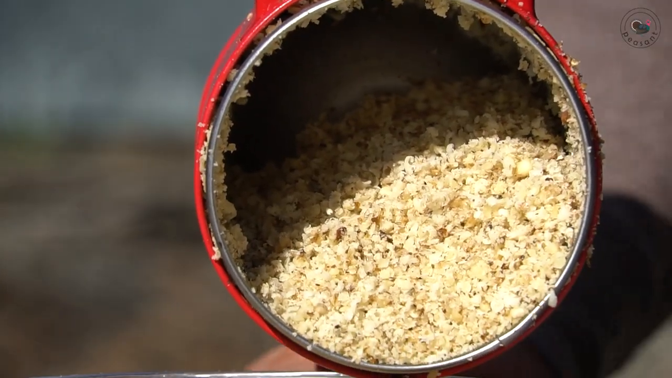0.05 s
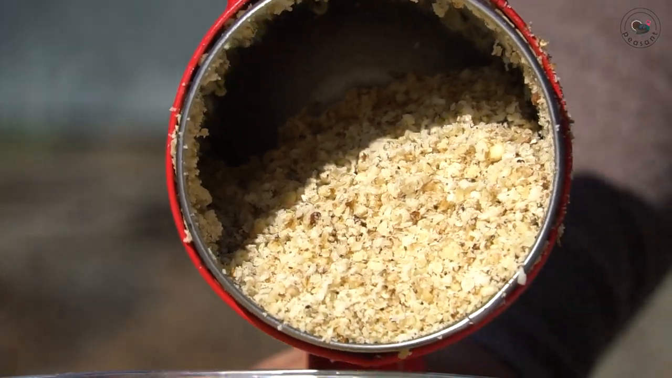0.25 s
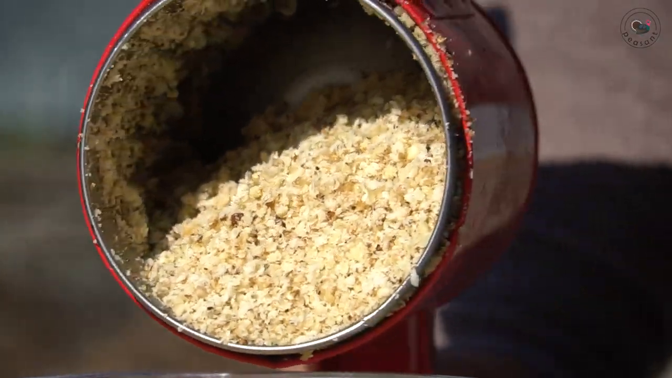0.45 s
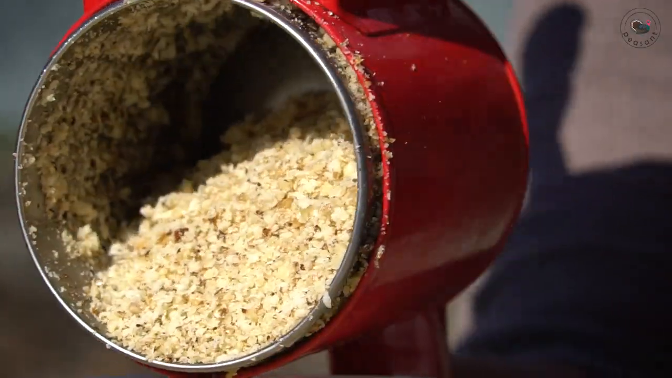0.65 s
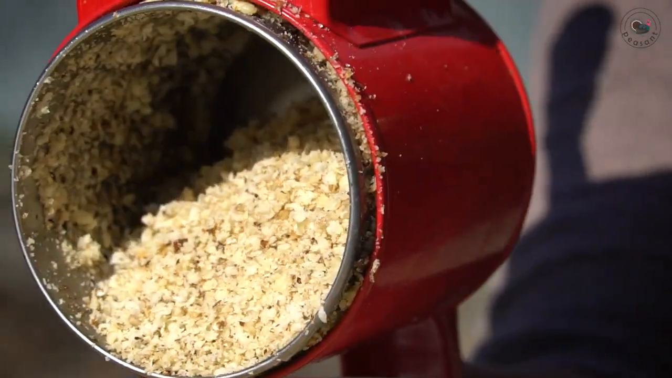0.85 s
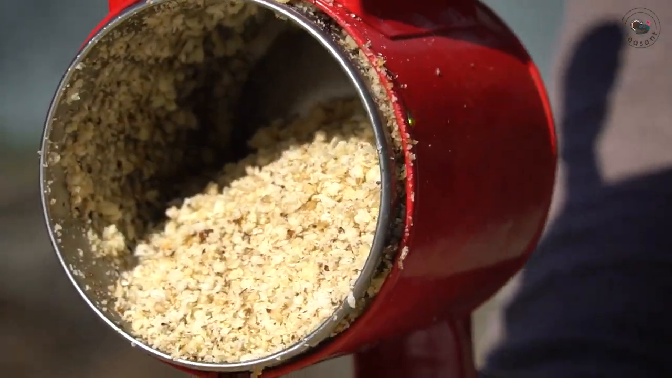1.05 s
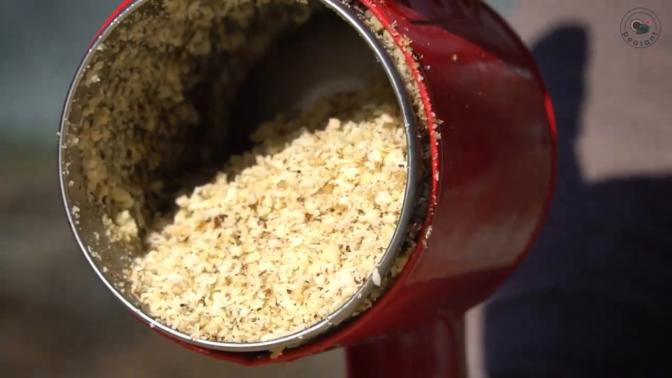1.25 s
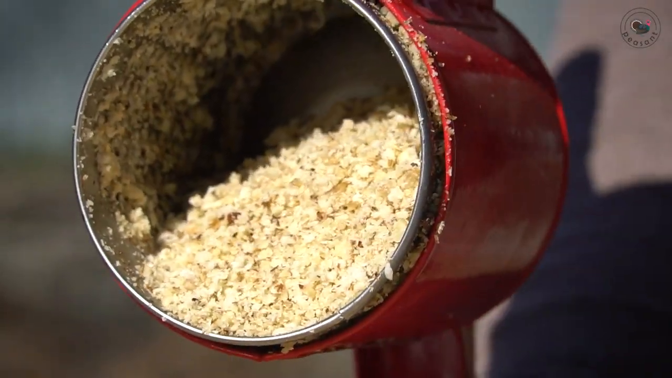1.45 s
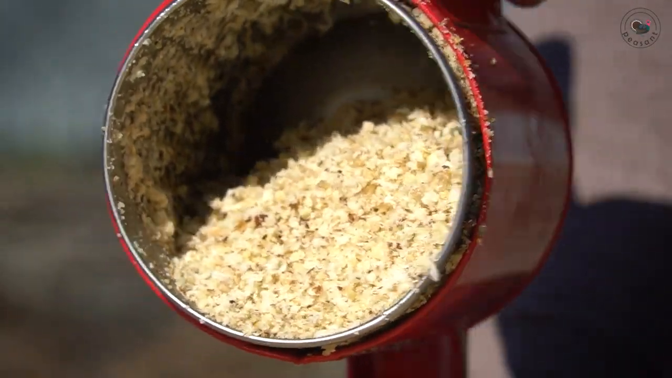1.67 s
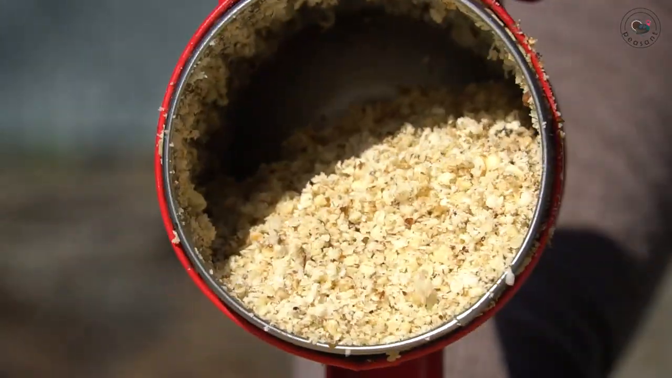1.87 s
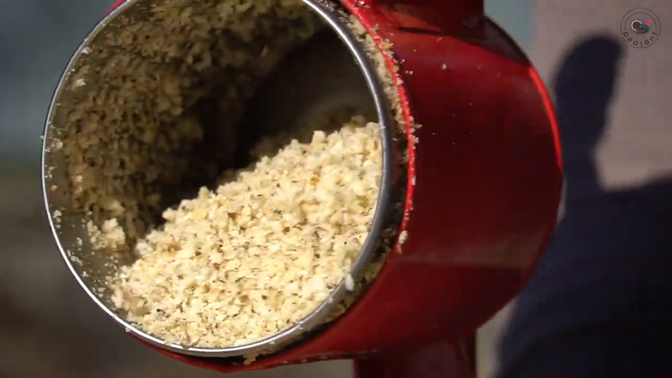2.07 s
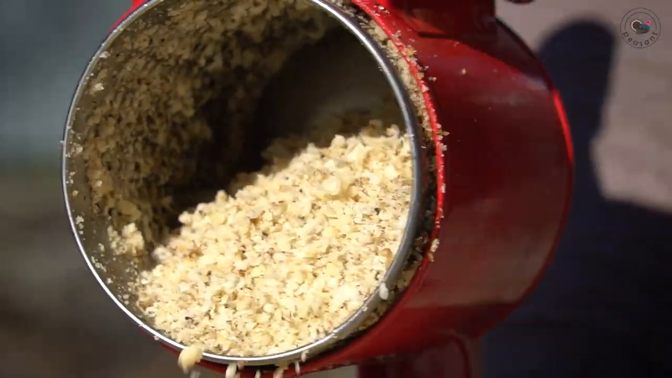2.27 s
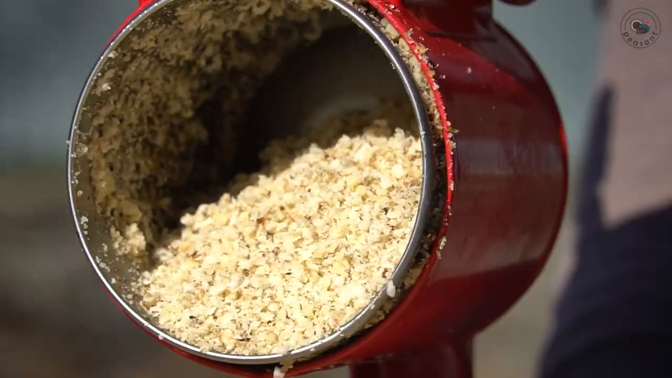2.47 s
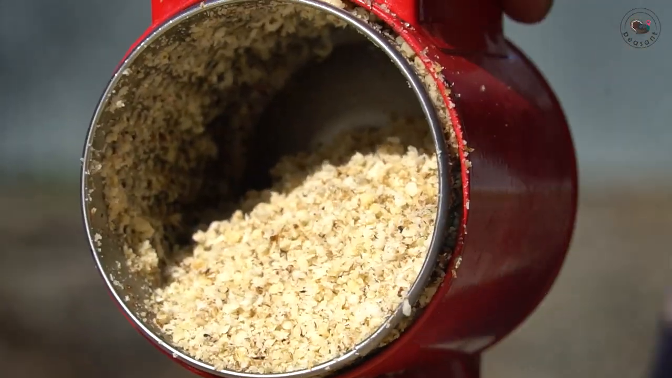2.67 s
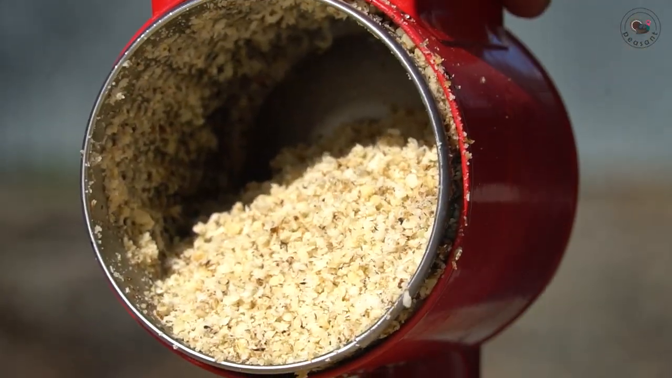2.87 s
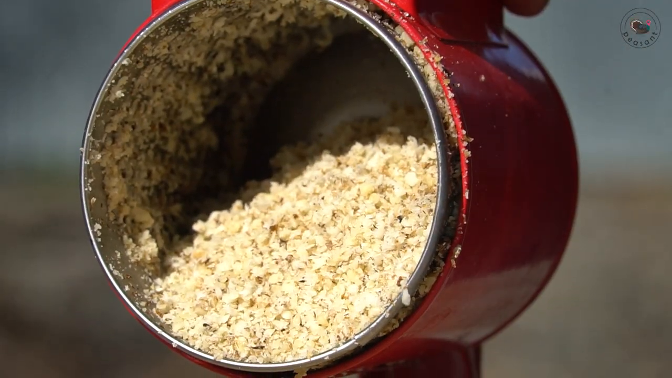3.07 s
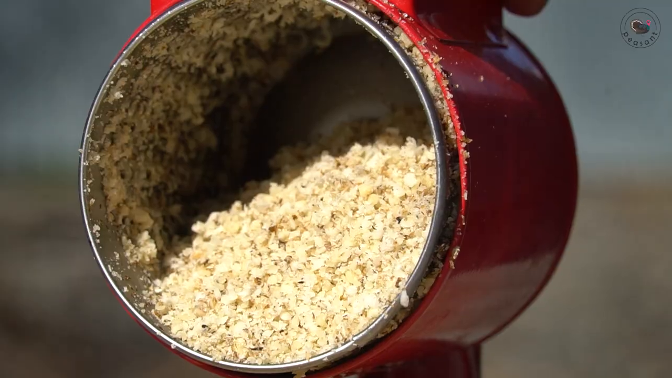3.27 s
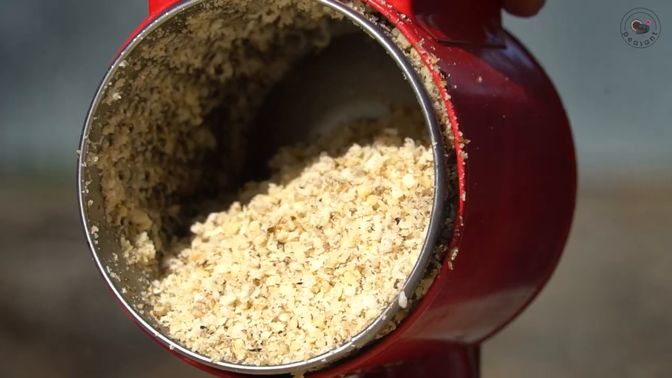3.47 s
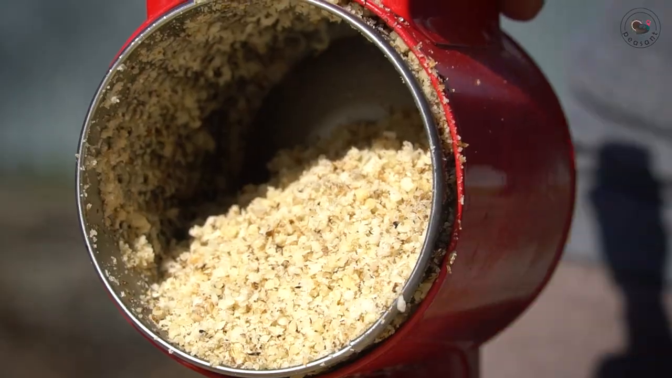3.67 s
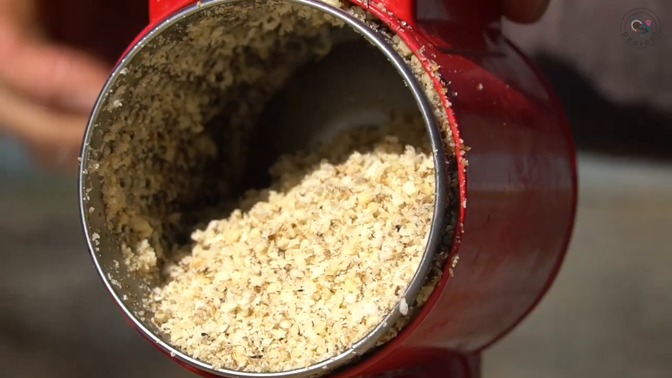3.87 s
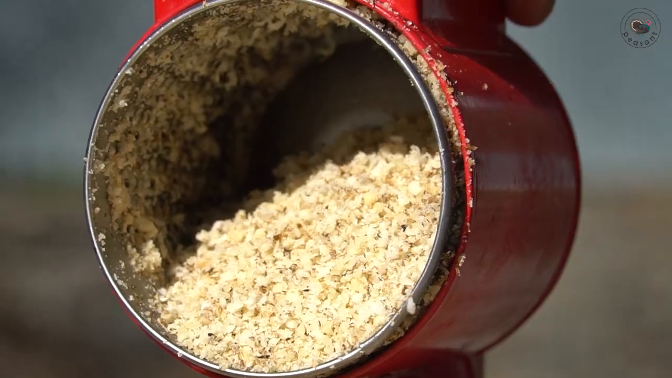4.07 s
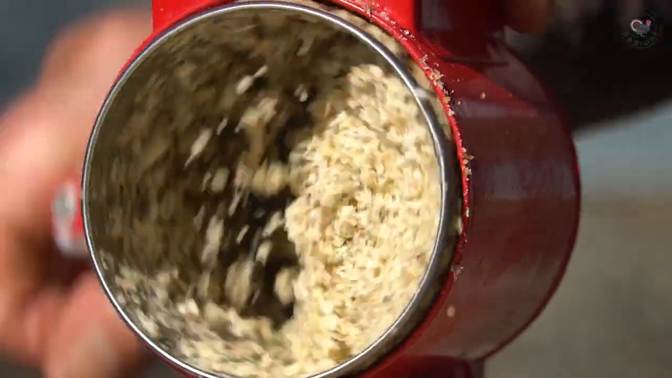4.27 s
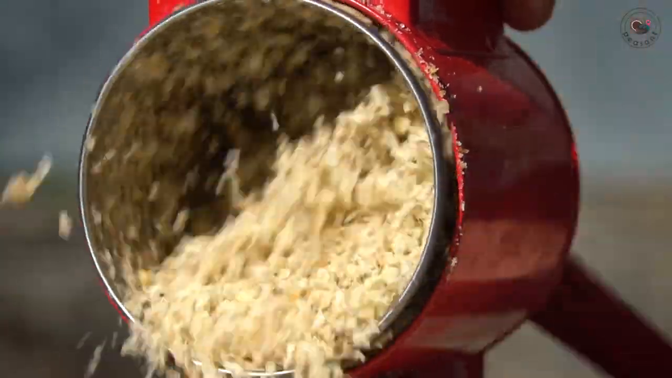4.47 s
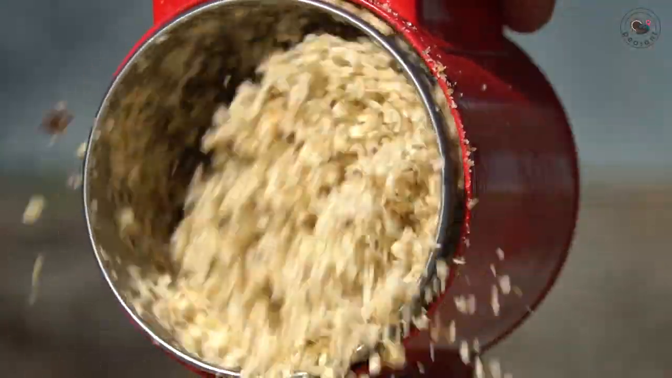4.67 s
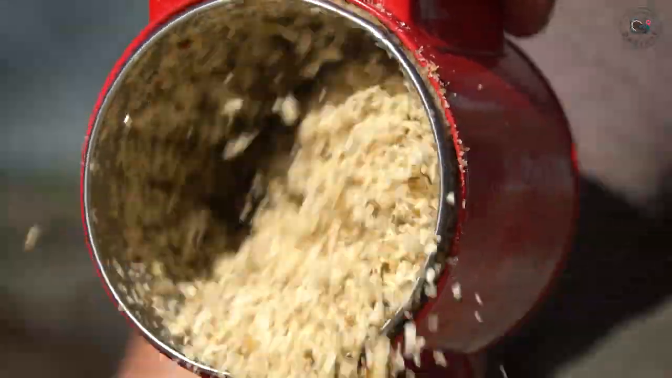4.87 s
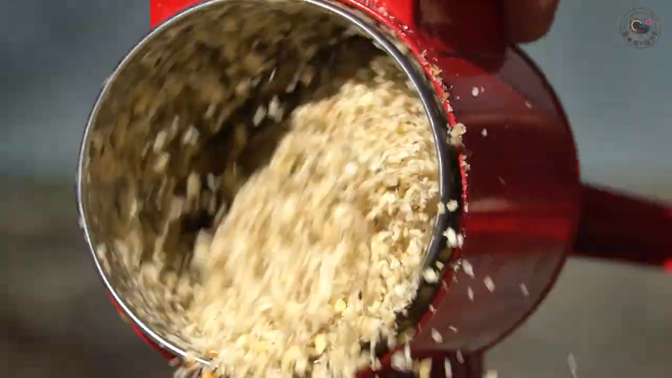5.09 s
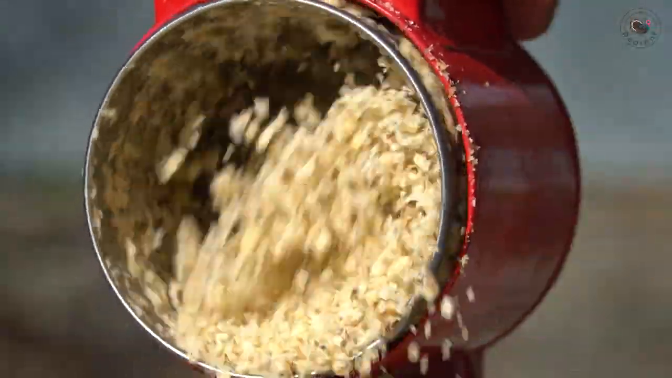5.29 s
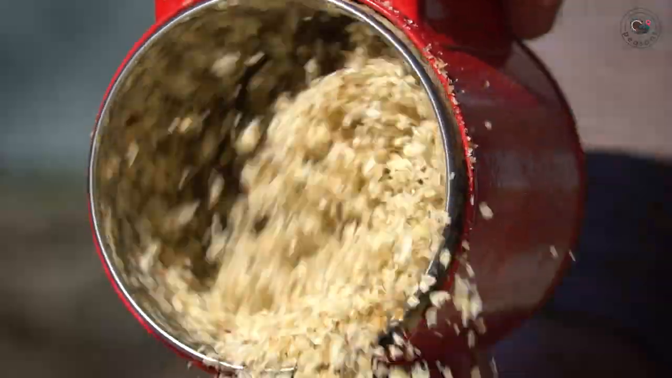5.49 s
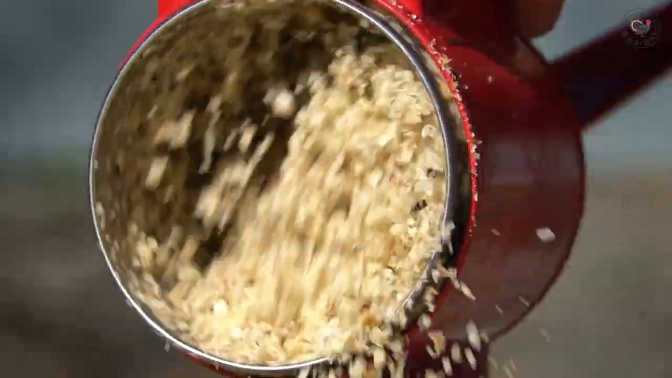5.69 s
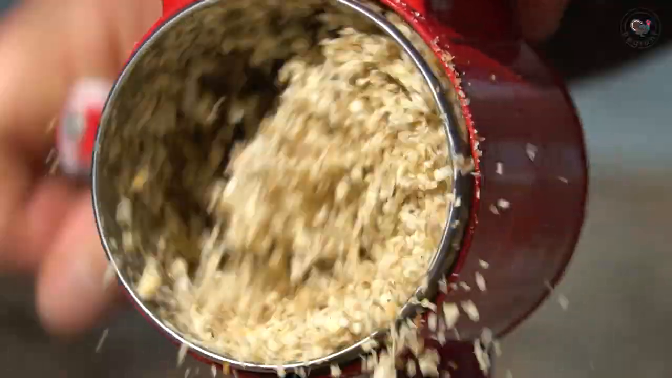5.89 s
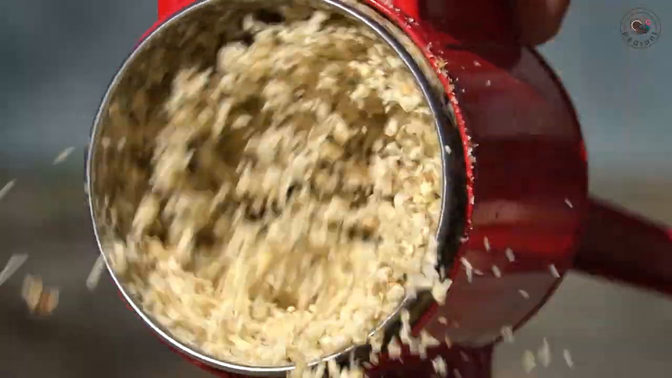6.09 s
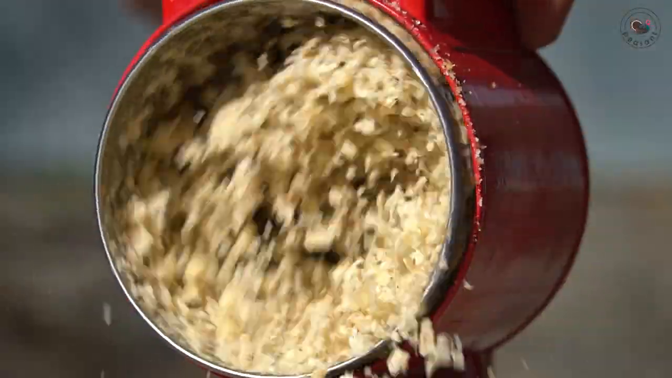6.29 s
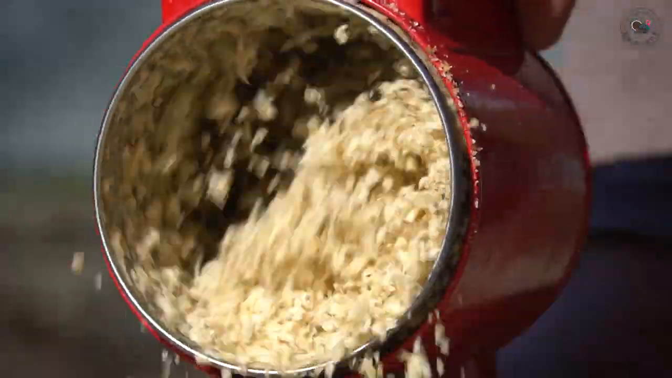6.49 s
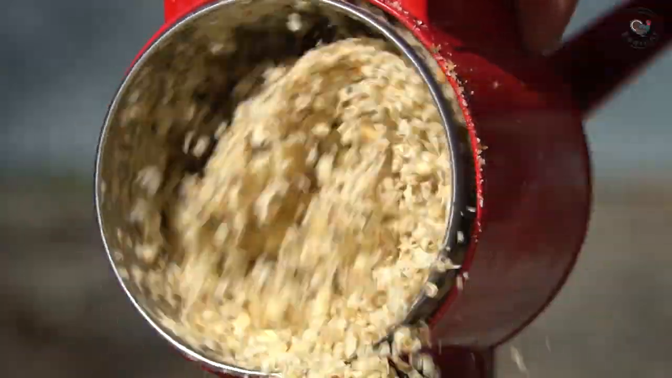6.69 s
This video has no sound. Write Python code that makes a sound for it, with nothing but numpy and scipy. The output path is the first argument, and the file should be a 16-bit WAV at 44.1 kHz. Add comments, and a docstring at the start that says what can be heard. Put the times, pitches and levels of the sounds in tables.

```python
"""An outdoor table in quiet air, the stereo microphone very close to a drum grater full of nuts.
While it is handled, a sleeve rustles, a palm slides over the enamel, the loose crank clacks and
the drum bumps in its housing. Then the crank is turned by hand: the cutters bite through the nuts
and shake housing and table, the steel drum rasps, nuts crack and gratings patter inside."""
import sys
import numpy as np
from scipy import signal
from scipy.fft import rfft, irfft
from scipy.io import wavfile
from scipy.ndimage import uniform_filter1d

SR = 44100
rng = np.random.default_rng(int(sys.argv[2]) if len(sys.argv) > 2 else 0)


def to_wav(s):
    """Save 16-bit WAV."""
    ch = np.atleast_2d(s).T  # columns
    pcm = np.round(np.clip(ch, -1, 1) * 32767)  # PCM
    wavfile.write(sys.argv[1], SR, pcm.astype(np.int16))


N = 297234
TIME = np.arange(N) / SR
HIT_TIME = TIME[:SR // 4]  # seconds within one knock

# Spectra at the microphone. Each row: frequency in Hz, relative level in dB.
AIR_SPECTRUM = [(15, -48), (25, -6.5), (82, -5), (217, -7.5), (309, -5.5), (503, -12.5), (796, -14.5),
                (2280, -22.5), (6920, -30.5), (14400, -32.5), (16000, -35)]
AIR_SIDE_SPECTRUM = [(80, -14), (200, -10.5), (700, -3.5), (2400, -1)]  # side against middle
SLEEVE_SPECTRUM = [(500, -12), (1500, -0.5), (2600, -3.5), (3300, 7), (4300, 3.5), (5200, -3), (7000, -10),
                   (16000, -17.5)]
SKIN_SPECTRUM = [(1500, -14), (4000, 0), (8000, -1), (13000, 0.5), (16000, -2)]  # skin on enamel
TICK_SPECTRUM = [(1200, 3), (1900, -3.5), (2400, -7.5), (3400, 4), (4300, -2.5), (5500, -12), (8000, -20),
                 (16000, -38)]  # hard parts meeting
SNAP_SPECTRUM = [(1000, -21), (3000, 3), (6000, 3.5), (9000, 2), (12000, -2), (16000, 0.5)]
CRACK_SPECTRUM = [(600, -16), (1400, 3.5), (2000, -7), (2450, -6), (3300, -7), (5000, -17.5), (16000, -48)]
STEEL_SPECTRUM = [(600, -34.5), (1100, -0.5), (1400, -8), (1750, -2.5), (2050, -0.5), (2450, -11),
                  (2950, -1), (3250, -5.5), (3600, -4.5), (4200, -10.5), (5100, -13.5), (5700, -10),
                  (6500, -17.5), (16000, -26)]  # the rasping drum
GRATINGS_SPECTRUM = [(1500, -41), (4000, 0), (7000, 4), (9000, 8), (10500, -3), (11800, 6), (13000, 1.5),
                     (14700, 9.5), (16000, -6)]

# Modes of struck parts. Each row: frequency in Hz, relative level in dB, seconds to fall 60 dB.
CRANK_MODES = [(122, -29, .12), (308, -4, 0.17), (495, -8, 0.14), (560, -5.5, 0.12), (659, -6, 0.056),
               (770, -3.5, 0.092), (957, -6, 0.089), (1225, 4.5, 0.024), (1433, 1, 0.037),
               (1657, -3, 0.025)]
SEAT_MODES = [(128, -24, 0.071), (205, -9.5, 0.17), (251, -2.5, 0.087), (306, 6, 0.078), (401, 7, 0.042)]  # the drum seated in its housing
SHELL_MODES = [(631, 3, 0.026), (808, -6, 0.056), (999, 0, 0.039), (1172, -7.5, 0.047), (1500, -0.5, 0.029),
               (1790, -30, 0.02)]  # the housing shell
WALL_MODES = [(1770, -5.5, 0.037), (1912, -8.5, 0.055), (2036, -1, 0.018), (2520, -7.5, 0.025),
              (3200, -4, 0.011), (3540, -19, 0.0083)]  # the steel drum wall, damped by the nuts inside
# Resonances of shaken parts. Each row: frequency in Hz, bandwidth in Hz, relative level in dB.
TABLE_RESONANCES = [(61.4, 12, -3.5), (106.6, 17, -9), (132, 7.5, -1.5)]
HOUSING_RESONANCES = [(239.6, 70, -5.5), (308.4, 25, 3.5), (386.4, 57, -0.5), (443.5, 75.6, 4),
                      (500, 102, 2), (620, 96, -1.5), (734, 98, 1.5), (837, 91, 1.5), (915.6, 76, -1.5)]

# Strokes of sleeve and palm. Each row: middle in seconds, length in seconds, relative level in dB.
SLEEVE_BRUSHES = [(0.034, 0.042, -48.5), (0.16, 0.17, -49), (0.406, .1, -46.5), (0.557, 0.1, -56.5),
                  (0.741, 0.02, -49.5), (1.0, 1, -64.5)]
PALM_SLIDES = [(0.12, 0.031, -54), (0.412, 0.15, -57), (1.475, 0.11, -59), (3.142, .1, -53)]
# Fingers shift on the housing. Each row: middle and length in seconds, relative rub and rumble in dB.
FINGER_RUBS = [(0.01, 0.093, -52, -50), (0.61, 0.1, -72, -55), (1.184, 0.062, -54, -52),
               (2.48, 0.21, -63, -58), (2.884, 0.066, -54.5, -60), (3.138, 0.16, -56, -62),
               (3.44, 0.14, -61, -52), (3.624, .16, -53, -51), (4.18, 0.08, -54, -55)]
# The crank drops through its play. Each row: start in seconds, relative level in dB, tick offset in dB.
CRANK_CLACKS = [(0.4, -17, -6), (0.5185, -19, -8.5), (1.2405, -15, -6.5), (1.8771, -15.5, -7),
                (2.0268, -18, -13), (3.9237, -17.5, -7.5)]
# The drum bumps in the housing. Each row: start in seconds, relative level in dB,
# shell offset in dB, wall and tick offset in dB, relative table level in dB.
DRUM_BUMPS = [(0.245, -28, -16, -22, -40.5), (0.894, -38.5, -13, -15, -46.5), (0.971, -36.5, -15, -29, -49),
              (1.008, -34, -13, -19, -55), (1.054, -33.5, -18, -14.5, -46),
              (1.322, -23, -10.5, -18.5, -44.5), (1.338, -27, -33, -23, -49), (1.669, -32.5, -29, -40, -51),
              (1.742, -14, -6.5, -27.5, -51), (1.793, -27, -24, -13.5, -43.5),
              (1.984, -33.5, -20, -28, -50), (2.1, -24, -12, -8.5, -45), (2.367, -29, -21, -14, -58),
              (2.443, -43.5, -4, -14, -60), (2.514, -37, -17, -24, -66), (2.631, -43, -9, -28, -56),
              (2.867, -39.5, -10, -4, -64), (2.953, -31.5, -17, -23, -55), (3.567, -41, -6, -8, -60),
              (3.787, -29.5, -15, -25, -58), (3.862, -15, -7, -12.5, -55), (4.069, -23, -27, -14, -50),
              (4.129, -20.5, -15.5, -9.5, -53), (4.74, -16.5, -8.5, -24, -50),
              (6.278, -12.5, -19.5, -23, -42)]
# Brittle bits snap and whole nuts crack. Each row: start in seconds, relative level in dB.
BIT_SNAPS = [(0.106, -39), (0.624, -38), (1.3966, -39), (4.1654, -40.5), (4.4766, -17), (4.6815, -17),
             (4.6897, -14), (4.898, -23), (5.035, -22.5), (5.104, -16.5), (5.5156, -20.5), (5.7547, -19),
             (6.4295, -22), (6.502, -23)]
NUT_CRACKS = [(4.232, -35), (4.3293, -20), (4.6604, -20.5), (4.731, -28), (5.0452, -27), (5.083, -25),
              (5.363, -20), (5.441, -23), (5.633, -27), (6.385, -29), (6.6164, -31)]
# The crank catches between pushes. Each row: time in seconds, depth in dB, recovery in seconds.
CRANK_CATCHES = [(5.11, -14.5, 0.077), (6.285, -8, 0.1)]
# Load on the cutters as nuts are pressed in and used up.
# Each row: time in seconds, relative housing level in dB, relative rasp level in dB.
CUTTER_LOAD = [(4.3, -27.5, -37.5), (4.47, -25.5, -34.5), (4.56, -28.5, -37.5), (4.66, -25.5, -35.0),
               (4.79, -29.5, -43.5), (4.87, -23.0, -34), (4.97, -28.5, -42.5), (5.09, -29.0, -36.5),
               (5.19, -28.5, -38), (5.23, -27.5, -38), (5.29, -33, -40.5), (5.45, -26, -35.5),
               (5.62, -26.5, -36.0), (5.87, -30.5, -36), (6.02, -24.5, -31.0), (6.14, -27, -33),
               (6.26, -24, -37), (6.37, -29.5, -39), (6.46, -24, -36.5), (6.54, -29.5, -38.5),
               (6.62, -24.5, -35.5), (6.74, -28.0, -35)]


def undb(db):
    """Decibels to gain."""
    return 10 ** (np.asarray(db) / 20)


def unit(x):
    """Scale to rms 1."""
    return x / np.sqrt(np.mean(x ** 2))


def crest(x):
    """Scale to peak 1."""
    return x / np.abs(x).max()


def walk(rate):
    """Glide to a new random value rate times a second, at rms 1."""
    hold = int(SR / rate)
    steps = np.repeat(rng.standard_normal(N // hold + 1), hold)
    return unit(uniform_filter1d(steps, hold)[:N])


def colour(x, spectrum, size=4096):
    """Minimum-phase filter with the given spectrum."""
    hz, db = np.transpose(spectrum)
    bin_hz = np.arange(size // 2 + 1) * SR / size
    log_gain = np.log(undb(np.interp(np.log(bin_hz + 1), np.log(hz), db)))
    cepstrum = irfft(log_gain)[:size // 2] * np.r_[1, np.full(size // 2 - 1, 2)]
    response = irfft(np.exp(rfft(cepstrum, size)))
    return signal.fftconvolve(x, response[None], axes=-1)[:, :x.shape[-1]]


def resonate(x, resonances):
    """Sum of resonances of alternating polarity."""
    return sum((-1) ** k * undb(db) * signal.lfilter(*signal.iirpeak(hz, hz / width, SR), x)
               for k, (hz, width, db) in enumerate(resonances))


def stereo(pair, side_db, pan_db=0):
    """Two signals as middle and side, leaning left by pan_db."""
    side = undb(side_db) * pair[1]
    return np.array([(pair[0] + side) * undb(pan_db / 2), (pair[0] - side) * undb(-pan_db / 2)])


def grains(rate, spread_db):
    """Two streams of tiny random impulses of uneven size, about rate a second."""
    impulses = (rng.random((2, N)) < rate / SR) * rng.choice([-1, 1], (2, N))
    return impulses * undb(spread_db * np.minimum(rng.standard_normal((2, N)), 2.5))


def burst(spectrum, t60):
    """A short crack of noise, at peak 1."""
    noise = rng.standard_normal((2, len(HIT_TIME)))
    return crest(colour(noise * undb(-60 * HIT_TIME / t60), spectrum))


def ring(modes, lag_s, detune):
    """Struck modes build over half a cycle; bending waves bring the low ones later (lag_s at 1 kHz)."""
    out = 0
    for k, (hz, db, t60) in enumerate(modes):
        age = np.maximum(HIT_TIME - lag_s * np.sqrt(1000 / hz), 0)
        envelope = np.minimum(2 * hz * age, 1) * undb(db - 60 * age / t60)
        detuned_hz = hz * (1 + detune * rng.standard_normal())
        out = out + (-1) ** k * envelope * np.sin(2 * np.pi * detuned_hz * age)
    return out


def add(out, start, sound):
    """Mix in one knock, start seconds into the scene."""
    i = int(start * SR)
    out[:, i:i + len(HIT_TIME)] += sound[..., :N - i]


def strokes(rows):
    """Gain of smooth strokes, each above half strength for its length."""
    return sum(undb(db) * 0.5 ** ((2 * (TIME - middle) / length) ** 2) for middle, length, db in rows)


def open_air(level_db=-54):
    """Steady, quiet air all round the microphone, narrow in the bass."""
    air = undb(level_db) * unit(colour(rng.standard_normal((2, N)), AIR_SPECTRUM))
    return stereo([air[0], colour(air[1:], AIR_SIDE_SPECTRUM)[0]], side_db=0)


def sleeve(gain_db=-1):
    """A sleeve brushes past, its fibres crackling finely."""
    fibres = grains(rate=1500, spread_db=6) * undb(2.9 * walk(100.5))
    cloth = stereo(unit(colour(fibres, SLEEVE_SPECTRUM)), side_db=-0.5, pan_db=-1)
    return undb(gain_db) * strokes(SLEEVE_BRUSHES) * cloth


def palm(crumb_db=-7):
    """Skin slides over enamel with a soft, bright swish, rolling a few crumbs."""
    skin = unit(grains(rate=14000, spread_db=8))
    crumbs = undb(crumb_db) * unit(grains(rate=120, spread_db=5))
    return strokes(PALM_SLIDES) * stereo(unit(colour(skin + crumbs, SKIN_SPECTRUM)), side_db=-2)


def rocking(rise_s=0.02, fall_s=0.084, clack_db=-46):
    """Gain of the grater rocking on the table: it swells into each knock and dies away after it."""
    knocks = [(at, db) for at, *_, db in DRUM_BUMPS] + [(at, clack_db) for at, *_ in CRANK_CLACKS]
    swells = (undb(db) * np.exp(-np.maximum((at - TIME) / rise_s, (TIME - at) / fall_s))
              for at, db in knocks)
    return np.sqrt(sum(swell ** 2 for swell in swells))


def grip(gain_db=-1, slip_db=-8):
    """Fingers rub the housing and the table rumbles, as the hand shifts or a knock rocks the grater."""
    rock = rocking()
    rub_gain = undb(slip_db) * rock + strokes((at, length, db) for at, length, db, _ in FINGER_RUBS)
    rumble_gain = rock + strokes((at, length, db) for at, length, _, db in FINGER_RUBS)
    friction = grains(rate=1600, spread_db=5.5) * undb(2 * walk(40))
    rub = resonate(friction, HOUSING_RESONANCES) + undb(-10.5) * colour(friction, CRACK_SPECTRUM)
    housing = stereo(unit(rub), side_db=-8.5, pan_db=-1)
    # a resting hand damps the table, so its boom is broad
    damped_spectrum = [(30, -15), (55, -5), (72, 3), (95, -5.5), (125, -7), (170, -8.5), (400, -46)]
    rumble = colour(grains(rate=2000, spread_db=4.5), damped_spectrum)
    table = stereo(unit(rumble), side_db=-33, pan_db=1.5)
    return undb(gain_db) * (rub_gain * housing + rumble_gain * table)


def crank_clacks(ring_db=-1, tick_db=4, rebound_s=0.00456, rebound_db=-7):
    """The crank hits its stop with a hard tick and rebounds once, softer and duller."""
    out = np.zeros((2, N))
    # the same stop is struck each time, so the clacks ring alike
    rings = np.array([ring(CRANK_MODES, lag_s=0.00096, detune=0.013) for _ in range(2)])
    body = stereo(crest(rings), side_db=-12.5, pan_db=-0.5)
    rebound = undb(rebound_db) * signal.lfilter(*signal.butter(2, 1100, fs=SR), body)
    for start, db, bright_db in CRANK_CLACKS:
        tick = stereo(burst(TICK_SPECTRUM, t60=0.018), side_db=1, pan_db=-5)
        add(out, start, undb(db + ring_db) * body)
        add(out, start + rebound_s, undb(db + ring_db) * rebound)
        add(out, start, undb(db + bright_db + tick_db) * tick)
    return out


def rattle(blow, db, t60, rate=500):
    """A blow followed by a fading scatter of loose contacts."""
    n = len(HIT_TIME)
    contacts = (rng.random(n) < rate / SR) * rng.standard_normal(n)
    fade = undb(db - 60 * HIT_TIME / t60) * (HIT_TIME > 0.006)
    return blow + signal.fftconvolve(blow, contacts * fade)[:n]


def drum_bumps(thud_db=-4, shell_db=6, wall_db=4, tick_db=6, thump_db=9, thump_hz=105, thump_t60=0.13):
    """The drum thuds in its seat, rattles and thumps the table; hard contacts ring its wall and tick."""
    out = np.zeros((2, N))
    for start, db, mid_db, bright_db, table_db in DRUM_BUMPS:
        thud = undb(thud_db) * crest(ring(SEAT_MODES, lag_s=0.0009, detune=0.039))
        shell = undb(mid_db + shell_db) * crest(ring(SHELL_MODES, lag_s=0.00132, detune=0.049))
        body = rattle(thud + shell, db=-22, t60=0.25)
        wall = undb(bright_db + wall_db) * crest(ring(WALL_MODES, lag_s=0.00078, detune=0.033))
        thump = ring([(thump_hz, table_db - db + thump_db, thump_t60)], lag_s=0.001, detune=0.15)
        tick = undb(bright_db + tick_db) * burst(TICK_SPECTRUM, t60=0.022)
        middle = body + wall + thump + tick[0]
        add(out, start, undb(db) * stereo([middle, tick[1]], side_db=-4, pan_db=2.5))
    return out


def nut_fractures(snap_db=2.5, crack_db=3):
    """Small bits snap bright and dry; whole nuts crack against the drum, lower and longer."""
    out = np.zeros((2, N))
    for start, db in BIT_SNAPS:
        snap = stereo(burst(SNAP_SPECTRUM, t60=0.014), side_db=-6)
        add(out, start, undb(db + snap_db) * snap)
    for start, db in NUT_CRACKS:
        crack = stereo(burst(CRACK_SPECTRUM, t60=0.035), side_db=-3.5, pan_db=-2)
        add(out, start, undb(db + crack_db) * crack)
    return out


def table_boom(cuts):
    """Shaken by the cutting, the table top booms in its lowest modes."""
    push = signal.lfilter(*signal.butter(3, [58, 160], "band", fs=SR), cuts)
    return stereo(unit(resonate(push, TABLE_RESONANCES)), side_db=-27.5, pan_db=1.5)


def falling_gratings(chip_db=-6):
    """Gratings ride up the wall and pour back on to the steel, a few hard chips among soft flakes."""
    flakes = unit(grains(rate=9900, spread_db=5.5) * undb(1.6 * walk(90)))
    chips = undb(chip_db) * unit(grains(rate=38, spread_db=2.5))
    return unit(stereo(colour(flakes + chips, GRATINGS_SPECTRUM), side_db=-5.5, pan_db=-0.5))


def cranking(start_s=4.215, spin_up_s=0.093, catch_s=0.012, pour_db=-42, boom_db=-39):
    """Gains of housing, rasp, pour and boom: the crank spins up, catches twice and meets the load."""
    speed = np.clip((TIME - start_s) / spin_up_s, 0, 1)
    for at, depth_db, recovery_s in CRANK_CATCHES:
        seize = np.clip((TIME - at) / catch_s + 1, 0, 1)
        release = np.clip(1 - (TIME - at) / recovery_s, 0, 1)
        speed *= undb(depth_db * seize * release)
    times, housing_db, rasp_db = np.transpose(CUTTER_LOAD)
    housing = np.interp(TIME, times, housing_db)
    rasp = np.interp(TIME, times, rasp_db)
    # pour and boom follow about a third of the load's swing in dB; the boom also wavers
    pour = pour_db + 0.33 * (rasp - rasp_db.mean())
    boom = boom_db + 0.28 * (housing - housing_db.mean()) + 2 * walk(14)
    return speed * undb([housing, rasp, pour, boom])


def grating(bite_hz=68, jitter=0.35, fade_cycles=0.85, bite_spread_db=1.2, housing_db=0.5, rasp_db=1.5):
    """Cutters bite in uneven succession; each bite is a run of fractures shaking housing and drum."""
    housing_gain, rasp_gain, pour_gain, boom_gain = cranking()
    cycles = np.cumsum(bite_hz * np.exp(jitter * walk(60))) / SR
    strength = undb(bite_spread_db * rng.standard_normal(N))[cycles.astype(int)]
    bite = strength * (0.66 + np.exp(-(cycles % 1) / fade_cycles))
    cuts = bite * grains(rate=2600, spread_db=-0.5)
    # the soft kernel cushions the push on the housing
    push = signal.lfilter(*signal.butter(2, [190, 1300], "band", fs=SR), cuts)
    housing = undb(housing_db) * stereo(unit(resonate(push, HOUSING_RESONANCES)), side_db=-17.5, pan_db=2)
    scrape = unit(cuts) + unit(bite * grains(rate=5000, spread_db=4))
    rasp = undb(rasp_db) * stereo(unit(colour(scrape, STEEL_SPECTRUM)), side_db=-8.5, pan_db=-1.5)
    return (housing_gain * housing + rasp_gain * rasp
            + pour_gain * falling_gratings() + boom_gain * table_boom(cuts))


def scene():
    """The grater and the hands right at the microphone, the open air behind them."""
    grater = grating() + crank_clacks() + drum_bumps() + nut_fractures()
    return grater + sleeve() + grip() + palm() + open_air()


def record(dry, top_hz=16000):
    """The recorder cuts the top steeply."""
    return signal.sosfilt(signal.ellip(10, 0.2, 80, top_hz, fs=SR, output="sos"), dry)


dry = scene()
out = record(dry)
to_wav(out)
```